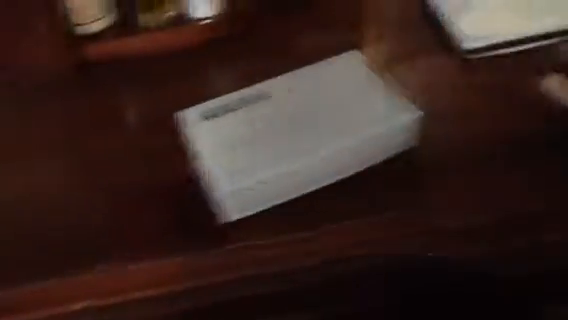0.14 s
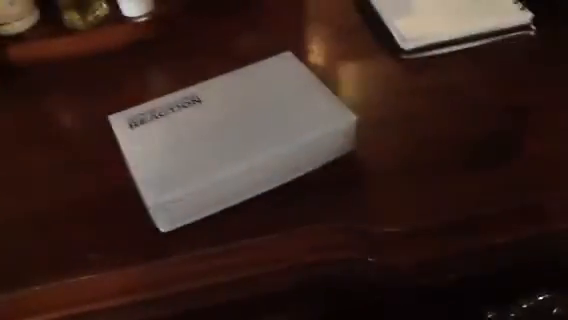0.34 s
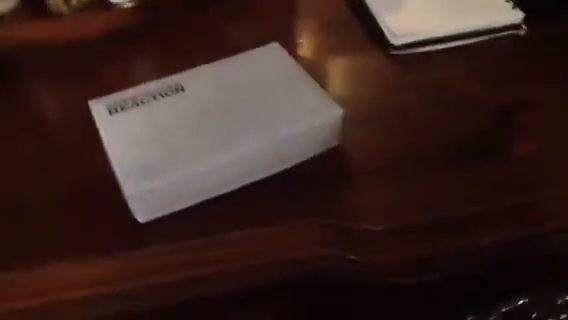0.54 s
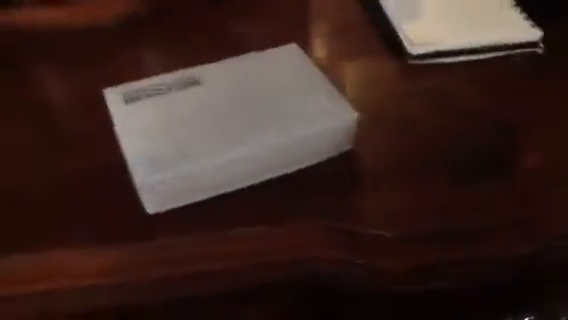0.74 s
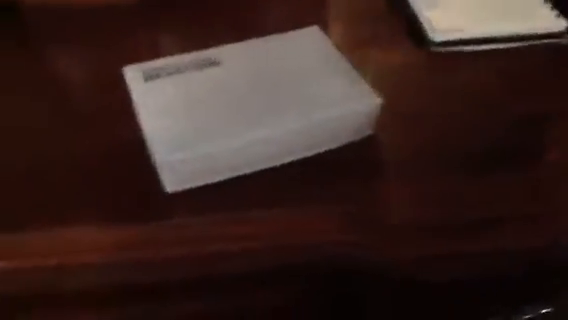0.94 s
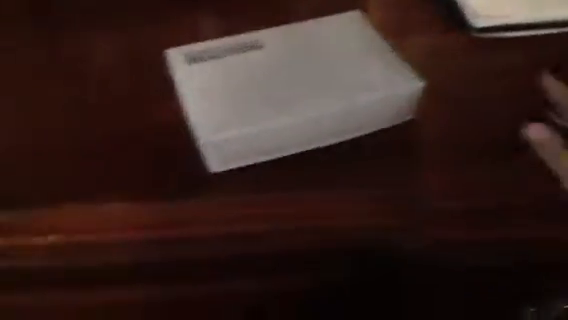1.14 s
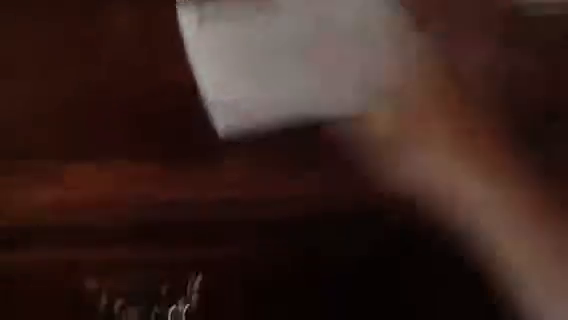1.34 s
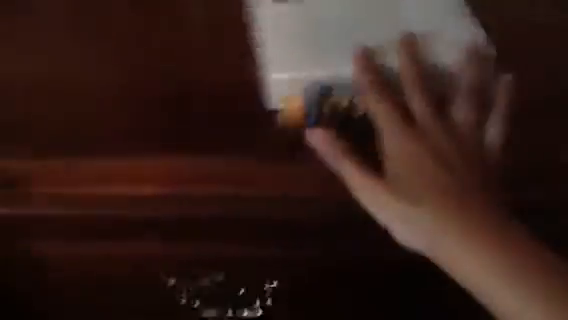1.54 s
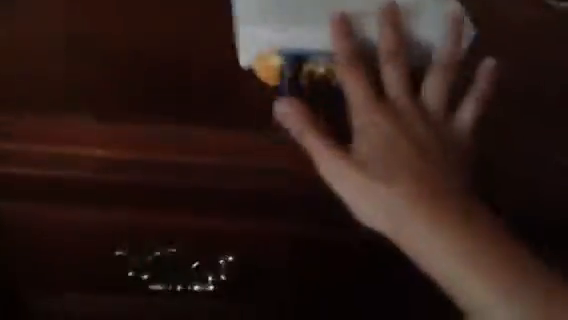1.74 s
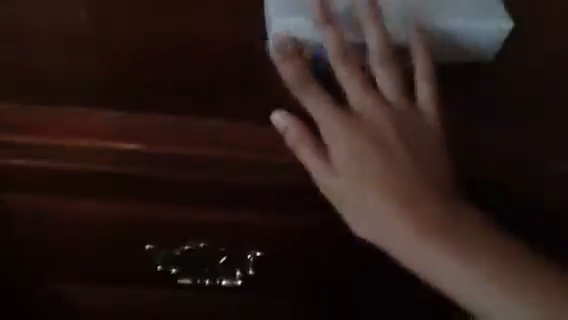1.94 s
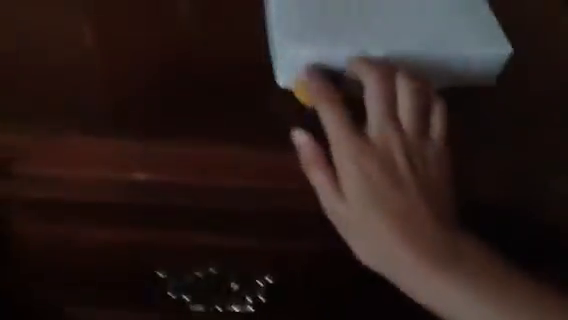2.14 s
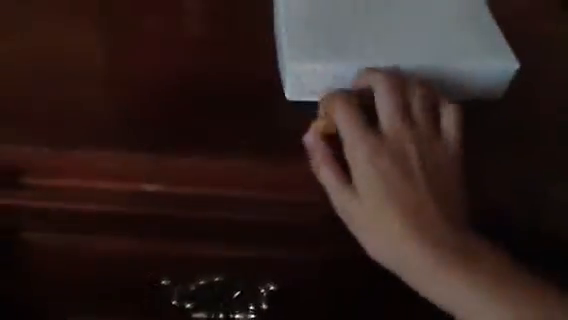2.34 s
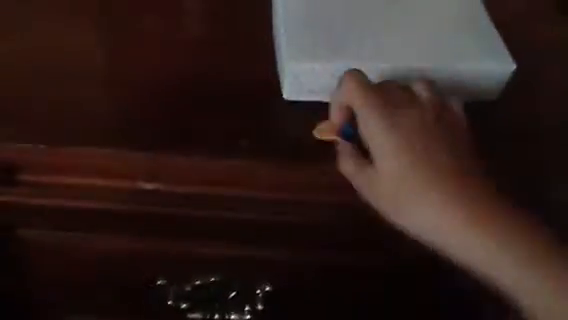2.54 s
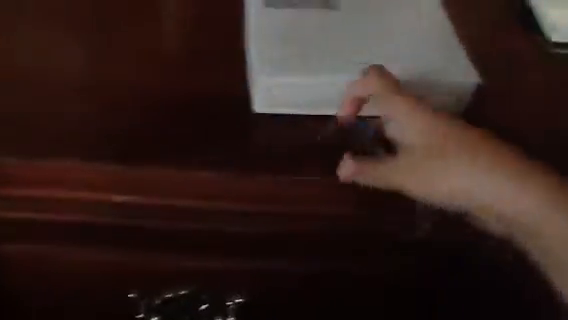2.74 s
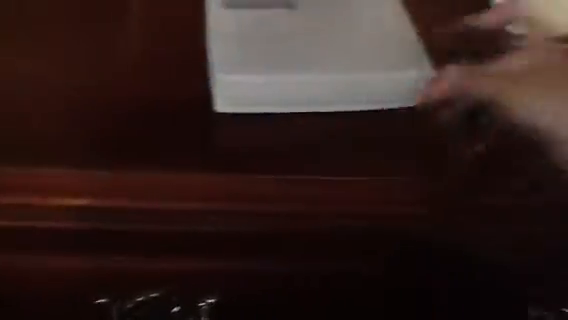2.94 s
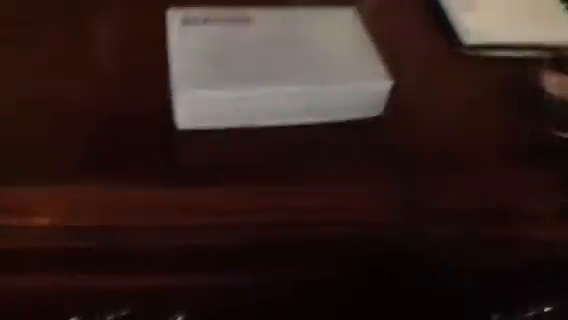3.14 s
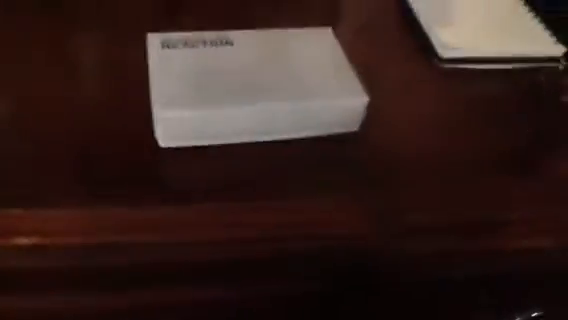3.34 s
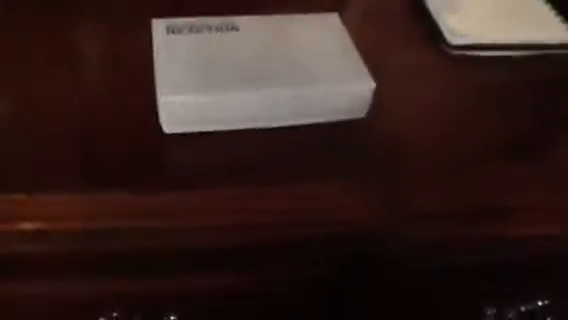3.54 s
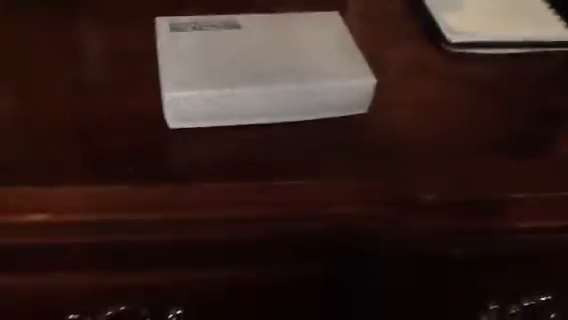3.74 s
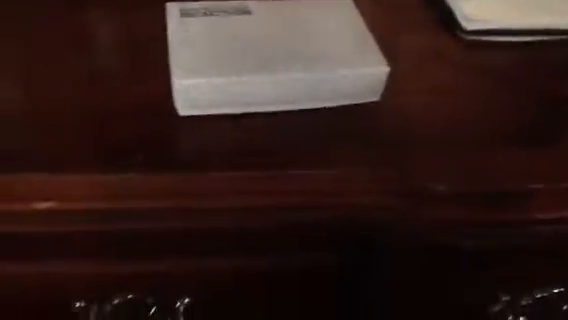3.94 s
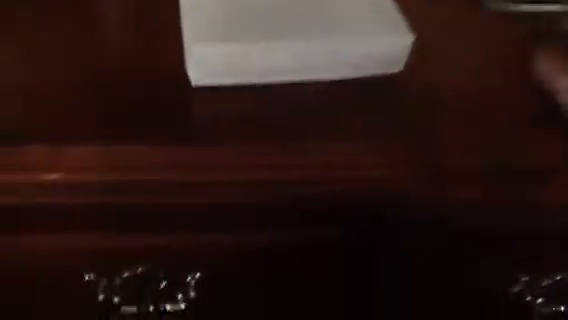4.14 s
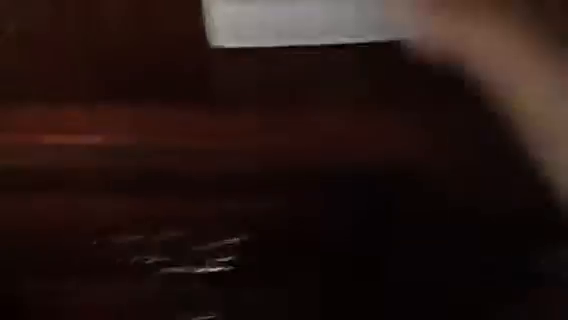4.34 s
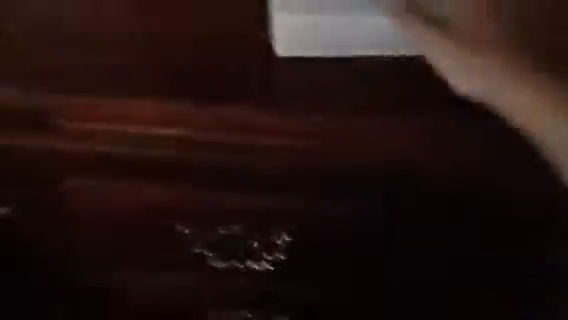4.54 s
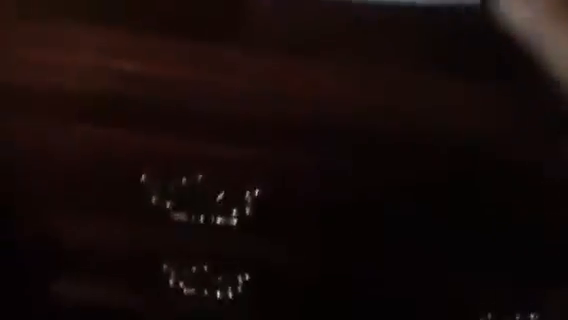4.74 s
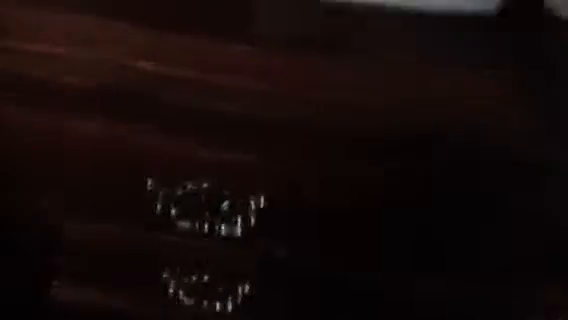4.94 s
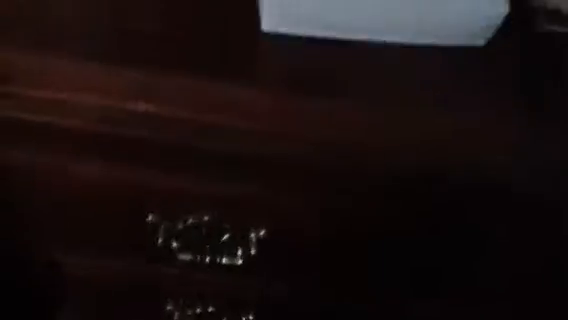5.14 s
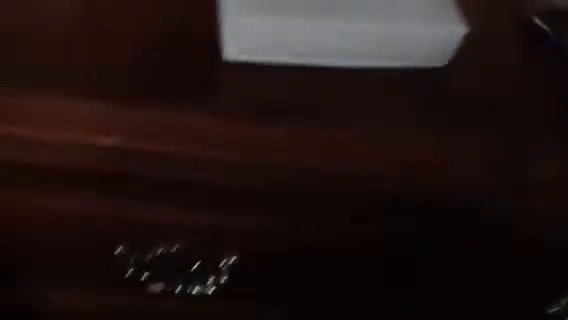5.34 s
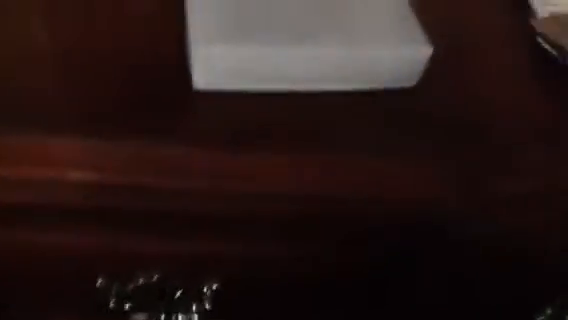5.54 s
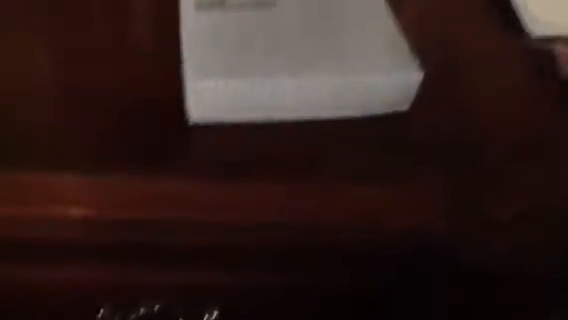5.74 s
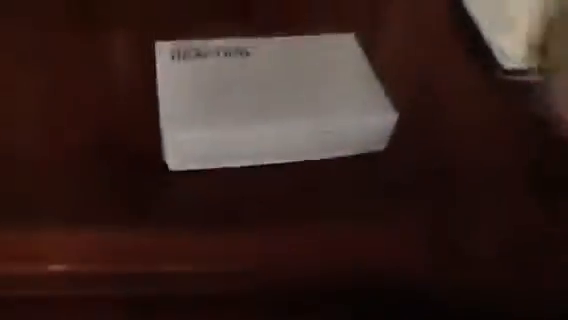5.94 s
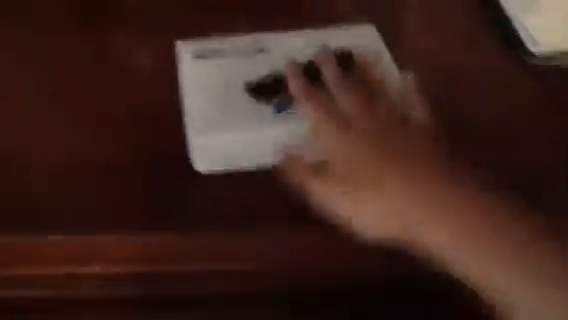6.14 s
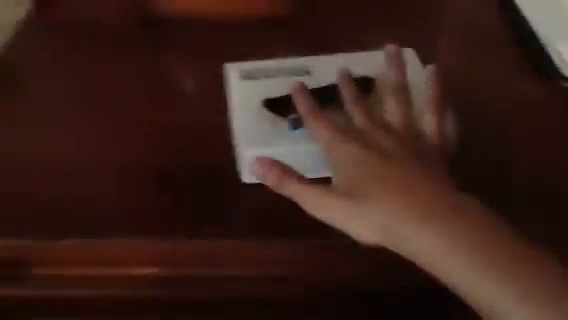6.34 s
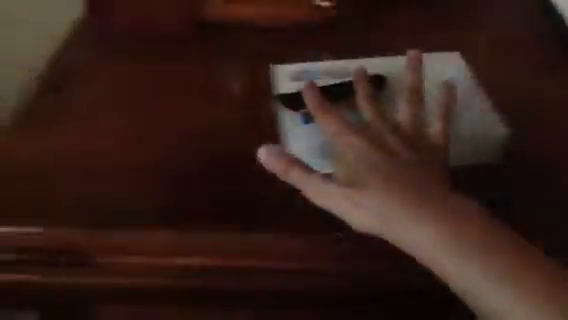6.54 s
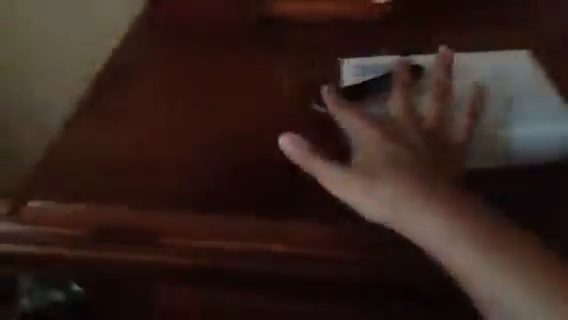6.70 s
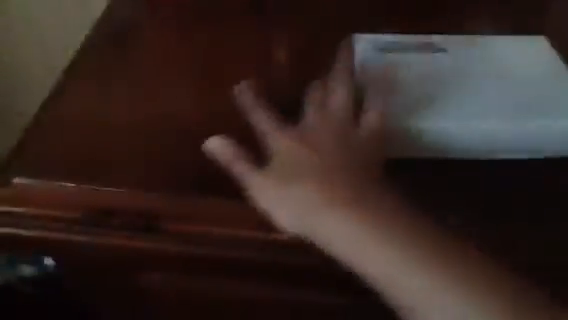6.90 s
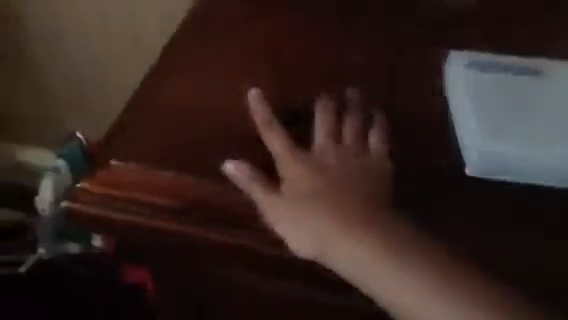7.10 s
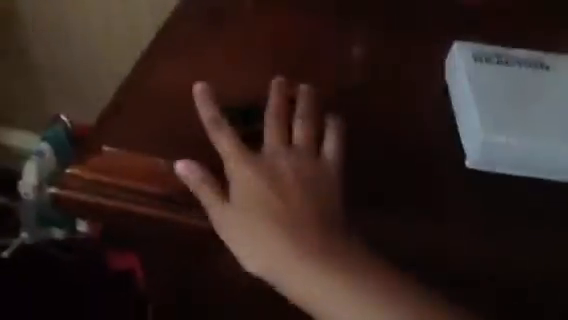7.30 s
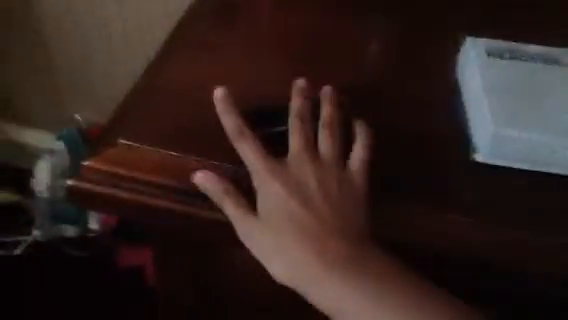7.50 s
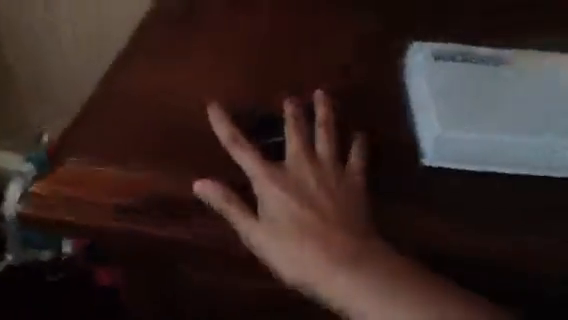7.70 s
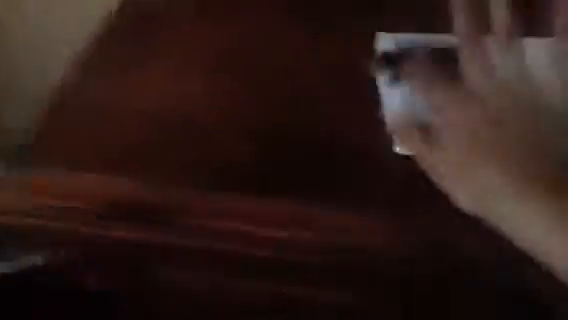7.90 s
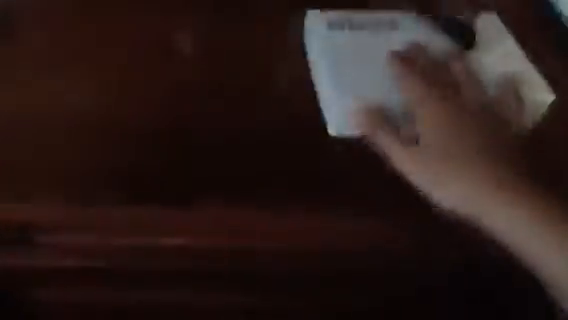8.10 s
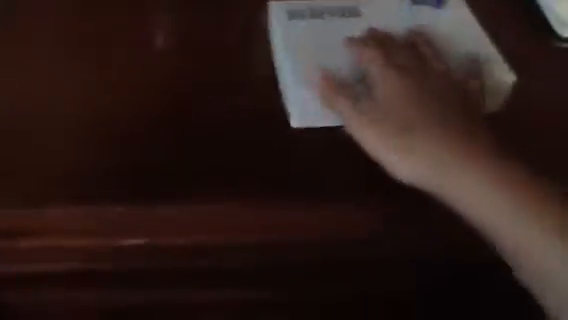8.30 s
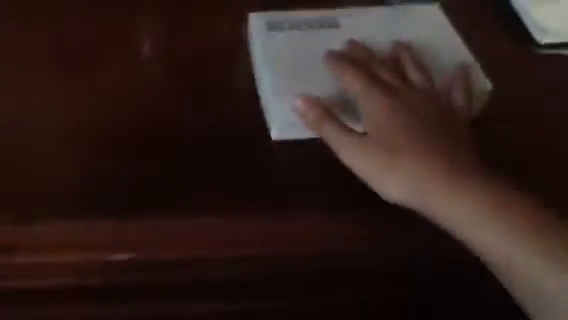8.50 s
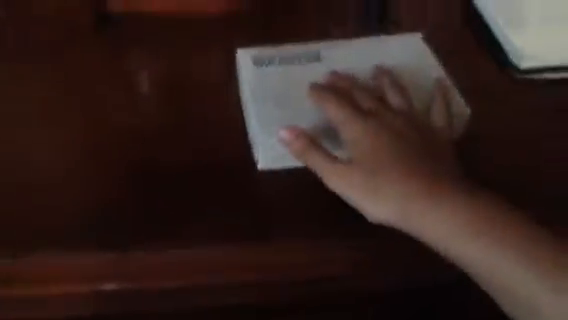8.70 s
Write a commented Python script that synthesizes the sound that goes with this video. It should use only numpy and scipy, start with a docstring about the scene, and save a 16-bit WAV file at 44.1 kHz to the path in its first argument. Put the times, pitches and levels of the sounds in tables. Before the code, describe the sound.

A toy fingerboard clatters on a wooden table in a small room. Its tiny wheels roll with a gritty rumble, then the deck clacks, the metal trucks tick and rattle, and the tabletop knocks hollowly. Clusters of hits come every second or so, some duller on a cardboard box, with light scrapes and brief squeaks between them. The sound is close, with short echoes and a faint room hush.

```python
"""A toy fingerboard clatters on a wooden table and a cardboard box in a small room.
Each hit rings the little deck, ticks the metal trucks (the axle holders) and makes the tabletop boom;
the loose trucks rattle after it. The wheels rumble and hiss over the wood grain and sometimes squeak
as they stick and slip, while deck and fingers scrape as they slide. Nearby surfaces and the walls
add short echoes, and a quiet hush lies under it all."""
import sys
import numpy as np
from scipy import signal
from scipy.fft import rfft, irfft, next_fast_len
from scipy.io import wavfile
from scipy.ndimage import map_coordinates

SR = 44100
rng = np.random.default_rng(int(sys.argv[2]) if len(sys.argv) > 2 else 0)


def wav_record(signal):
    """Record a signal, one row per channel, as 16-bit PCM in the file named by sys.argv[1]."""
    frames = np.transpose(np.atleast_2d(signal))
    bounded = np.clip(frames, -1, 1)
    # unit amplitude maps onto the largest positive 16-bit level
    quanta = np.round(bounded * 32767).astype(np.int16)
    wavfile.write(sys.argv[1], SR, quanta)


N = 390726
TIME = np.arange(N) / SR


def from_db(db):
    """Turn decibels into a number to multiply a sound by."""
    return 10 ** (np.asarray(db) / 20)


def rms(x):
    """The average strength of a sound (root mean square)."""
    return np.sqrt(np.mean(x ** 2) + 1e-20)


def at_hz(points, hz, column=1):
    """Read a table at any pitch, blending between its rows."""
    points = np.array(points)
    return np.interp(np.log(hz + 1e-3), np.log(points[:, 0]), points[:, column])


def band(x, low_hz, high_hz, order=2):
    """Keep the part of a sound between two pitches."""
    sections = signal.butter(order, [low_hz, min(high_hz, .48 * SR)], "band", fs=SR, output="sos")
    return signal.sosfilt(sections, x + 1e-18)


def coloured(x, spectrum):
    """Turn each pitch up or down as a table says."""
    size = next_fast_len(N + 4096)
    gain = from_db(at_hz(spectrum, np.fft.rfftfreq(size, 1 / SR)))
    return irfft(rfft(x, size) * gain, size)[:N]


def envelope(strokes, column, swell_db, attack_s, release_s):
    """Loudness over time: each stroke sets in, swells to its level, eases off and stops."""
    gain = np.zeros(N)
    for row in strokes:
        start, rise_s, fall_s = row[:3]
        corners = start - attack_s + np.cumsum([0, attack_s, rise_s, fall_s, release_s])
        shape_db = np.interp(TIME, corners, [-60, -swell_db, 0, -swell_db, -60], left=-200, right=-200)
        gain += from_db(row[column] + shape_db)
    return gain


def drift(steps_per_s):
    """A smooth random wander, mostly between -1 and 1."""
    return map_coordinates(rng.standard_normal(8000), [TIME * steps_per_s], order=3, mode="wrap")


def ring(x, notes):
    """Shake an object so that its own notes ring; each dies away by 60 dB in its fade_s."""
    out = 0
    for hz, db, fade_s in notes:
        keep, turn = from_db(-60 / (fade_s * SR)), 2 * np.pi * hz / SR
        feedback = [1, -2 * keep * np.cos(turn), keep * keep]
        out = out + from_db(db) * signal.lfilter([1, 0, -1], feedback, x + 1e-18)
    return out


def fading(power, fade_s):
    """Store sound energy and let it leak away."""
    keep = from_db(-120 / (fade_s * SR))
    return signal.lfilter([1 - keep], [1, -keep], power + 1e-18)


def friction(grains_per_s, size_db, flutter_db):
    """Tiny surface bumps of uneven size, met at random."""
    sizes = from_db(size_db * np.minimum(rng.exponential(1, N), 4)) * rng.standard_normal(N)
    met = rng.random(N) < grains_per_s / SR
    grains = sizes * met * from_db(flutter_db * drift(70))
    return grains / rms(grains)


# The tone of the room's background noise: pitch_hz, gain_db
HUSH_COLOUR = [(15, -62.5), (25, -40), (48, -20.5), (91, -34), (133, -13.5), (173, -11.5), (253, -6.5),
               (289, -9), (495, -12), (703, -14.5), (804, -14.5), (919, -21), (4500, -22), (13200, -24),
               (15500, -31.5)]


def room_hush(level_db=-62.5):
    """A quiet, steady noise, strongest in the low notes."""
    hush = coloured(rng.standard_normal(N), HUSH_COLOUR)
    return from_db(level_db) * hush / rms(hush)


# How the room holds on to each pitch: pitch_hz, gain_db, fade_s
ROOM_ECHO = [(200, -14.5, 0.12), (350, -3.5, 0.23), (695, -5.5, 0.28), (1796, -7.5, 0.24), (5000, -3, .25),
             (12990, -8.5, 0.2)]


def wall_echoes(x, build_s=0.011, bands=15):
    """Sound bounces between the walls: in each band of pitches it builds up, then dies away."""
    out, edges = 0, np.geomspace(180, 17000, bands + 1)
    noise = rng.standard_normal((2, N))
    for k, (low, high) in enumerate(zip(edges, edges[1:])):
        hz = np.sqrt(low * high)
        arriving = fading(band(x, low, high) ** 2, build_s)
        stored = fading(arriving, at_hz(ROOM_ECHO, hz, column=2))
        echoes = band(noise[k % 2], low, high)
        out = out + from_db(at_hz(ROOM_ECHO, hz)) * np.sqrt(stored) * echoes / rms(echoes)
    return out


# The tone of the echoes off table, box and shelf: pitch_hz, gain_db
NEAR_COLOUR = [(100, -24), (200, -12.5), (400, -2), (900, -5), (2000, -8), (5000, -6.5), (14000, -3)]


def near_echoes(x, fade_s=0.13, build_s=0.0013):
    """Many quick echoes off nearby surfaces make the sound hollow."""
    t = np.arange(SR // 3) / SR
    echoes = rng.standard_normal(len(t)) * from_db(-60 * t / fade_s) * (1 - np.exp(-(t / build_s) ** 2))
    return coloured(signal.oaconvolve(x, echoes / np.linalg.norm(echoes))[:N], NEAR_COLOUR)


# Wheel squeaks: start_s, length_s, start_pitch_hz, glide_hz_per_s, level_db
SQUEAKS = [(1.226, 0.1, 1530, 2191.5, -36.5), (2.651, 0.079, 2820, -3500, -58.5),
           (3.165, 0.035, 977, -800, -45), (3.211, 0.052, 977, -400, -43), (3.451, 0.051, 805, 1800, -41.5),
           (4.265, 0.13, 2930, -6000, -49), (5.091, .1, 875, -600, -41.5), (5.635, 0.096, 760, 1288, -39.5),
           (5.7, 0.093, 1288, 1650, -29), (5.747, 0.12, 1366, 153, -51), (7.062, 0.12, 1455, 102, -47),
           (7.162, 0.13, 1423, 0, -51), (7.782, 0.087, 1504, 1198, -37)]


def squeaks(waver=0.036, steady_db=-33, flutter_db=2.5, octave_db=-17, rasp_db=-8):
    """A dry wheel sticks and slips on its axle: a raspy tone that swells, glides and fades."""
    out, wobble = np.zeros(N), waver * drift(260)
    rasp = band(rng.standard_normal(N), 30, 260)
    for start, length_s, hz, glide, db in SQUEAKS:
        on = (TIME > start) & (TIME < start + length_s)
        age = TIME[on] - start
        steadiness = 1 + from_db(db - steady_db)   # a loud squeak locks on to its pitch
        pitch_hz = (hz + glide * age) * (1 + wobble[on] / steadiness)
        phase = 2 * np.pi * np.cumsum(pitch_hz) / SR
        swell = np.abs(np.sin(np.pi * age / length_s)) ** 1.5
        out[on] += from_db(db) * swell * (np.sin(phase) + from_db(octave_db) * np.sin(2 * phase))
    return out * from_db(flutter_db * drift(100)) * (1 + from_db(rasp_db) * rasp / rms(rasp))


# Slides over table and box: start_s, press_s, ease_s, drone_gain_db, scratch_level_db
SCRAPES = [(1.5, 0.035, .1, -61, -37.5), (2.295, 0.013, 0.025, -64, -46.5), (2.68, 0.053, .12, -68, -59.5),
           (3.14, .02, 0.058, -53.5, -51.5), (3.22, 0.012, 0.022, -52, -46),
           (3.285, 0.008, 0.031, -46, -40.5), (4.25, 0.032, 0.21, -52, -43),
           (5.096, 0.011, 0.083, -59, -39.5), (5.255, 0.033, 0.078, -34.5, -38),
           (5.38, 0.025, 0.17, -40, -49), (6.38, 0.054, 0.34, -62, -61), (7.815, .008, .012, -62, -36.5),
           (7.85, .09, 0.16, -66, -44), (8.53, 0.14, 0.12, -46, -46.5), (8.77, 0.026, 0.046, -46, -41.5)]
# The tone of the scratch: pitch_hz, gain_db
SCRAPE_COLOUR = [(59, -63), (100, -27), (192, 15), (258, 9), (355, -26), (429, -7.5), (843, -17.5),
                 (2750, -20), (3320, -15), (4560, -32), (6950, -20), (15500, -27.5)]


def scraping():
    """Sliding deck and fingers scratch and make the tabletop drone (its notes are listed below)."""
    slips = friction(grains_per_s=5000, size_db=6.0, flutter_db=3.5)
    drone = band(ring(slips, TABLE_NOTES + PANEL_NOTES), 220, 330)
    scratch = band(coloured(slips, SCRAPE_COLOUR), 920, 15000)
    stroke = dict(swell_db=6, attack_s=.07, release_s=0.15)
    return (from_db(-7) * envelope(SCRAPES, column=3, **stroke) * drone / rms(drone)
            + envelope(SCRAPES, column=4, **stroke) * scratch / rms(scratch))


# The short, high notes of wheel and axle: pitch_hz, gain_db, fade_s
WHIRR_NOTES = [(3430, -2, 0.019), (5910, 3, 0.004), (7640, -3.5, .004)]


def whirr(bumps, gain_db):
    """Bumps make wheel and axle sing faintly."""
    sound = band(ring(bumps, WHIRR_NOTES), 2800, 9000)
    return from_db(gain_db) * sound / rms(sound)


# Pushes that set the wheels rolling: start_s, speed_up_s, coast_s, rumble_gain_db, hiss_gain_db
PUSHES = [(0.0, 0.014, 0.065, -51, -50.5), (0.16, 0.024, 0.15, -44, -53), (0.256, .15, .18, -37, -46),
          (0.745, .05, 0.035, -45.5, -52), (0.84, 0.084, 0.25, -36, -44.5), (1.245, .035, .006, -37.5, -47),
          (3.33, .045, 0.12, -42, -54), (3.59, 0.052, .12, -54.5, -63.5), (3.89, 0.038, 0.094, -53, -60),
          (3.99, 0.051, 0.12, -46, -58.5), (4.202, 0.0094, 0.0073, -35.5, -56),
          (5.095, 0.013, 0.13, -39, -52), (5.65, 0.013, 0.096, -45, -55), (5.89, 0.017, 0.011, -39, -53.5),
          (7.05, 0.07, 0.11, -49, -58.5), (7.315, .008, 0.0083, -46, -55), (7.69, 0.17, .01, -51, -64)]
# The tone of the rolling: pitch_hz, gain_db
ROLL_COLOUR = [(88, -21.5), (150, -13), (197, -3.5), (404, -13.5), (509, -3), (607, -1.5), (827, 5),
               (930, -5), (1370, -0.5), (2020, -4), (2920, -3.5), (4390, -21.5), (7560, -21),
               (13500, -26.5), (15500, -36)]
# The wheels' hollow notes: pitch_hz, gain_db, fade_s
WHEEL_NOTES = [(536, 1.5, 0.024), (800, -13, 0.04), (1020, -1, 0.078), (1430, -1, 0.06), (2310, 0.5, 0.058),
               (2910, -5, 0.022), (3565, 4.5, 0.017), (5480, -4, 0.01), (7360, 3, 0.01)]


def rolling():
    """Hard wheels run over the wood grain: a hollow rumble with a gritty hiss."""
    bumps = friction(grains_per_s=5400, size_db=1.5, flutter_db=3.2)
    hollow = ring(bumps, WHEEL_NOTES)
    sound = coloured(bumps + from_db(-13) * hollow / rms(hollow), ROLL_COLOUR)
    rumble, hiss = band(sound, 150, 2570), band(sound, 5700, 15000)
    singing_hiss = hiss / rms(hiss) + whirr(bumps, gain_db=-8.5)
    push = dict(swell_db=8.5, attack_s=0.13, release_s=0.12)
    return (from_db(-0.5) * envelope(PUSHES, column=3, **push) * rumble / rms(rumble)
            + from_db(5.5) * envelope(PUSHES, column=4, **push) * singing_hiss)


def rattling(graze_db=-30, graze_s=.008, rattle_db=-14.5, rattle_s=0.014):
    """The board grazes the surface just before each of the HITS below; its loose trucks rattle after."""
    gain, age = np.zeros(N + SR), np.arange(-SR // 20, SR // 5) / SR
    graze = from_db(graze_db) * np.exp(age / graze_s)
    rattle = from_db(rattle_db) * np.exp(-age / rattle_s)
    shape = np.where(age < 0, graze, rattle)
    for start_s, strength_db, _, metal_db, _ in HITS:
        start = max(int((start_s + age[0]) * SR), 0)
        gain[start:start + len(age)] += from_db(strength_db + .45 * metal_db) * shape
    grains = band(friction(grains_per_s=2800, size_db=9.0, flutter_db=5.0), 500, 14000, order=1)
    return gain[:N] * grains / rms(grains)


def strike(levels_db, notes_per_hit, band_hz, stretch, drag, chatter_db, ring_db):
    """One part answers each of the HITS below: a click, a brief chatter and its own ringing notes."""
    t, attack = np.arange(int(.2 * SR)) / SR, slice(0, SR // 100)
    out = np.zeros(N + len(t))
    firm_db, usual_weight_db = -28.5, -12
    for (start_s, strength_db, weight_db, *_), db, notes in zip(HITS, levels_db, notes_per_hit):
        # light hits drag on, and extra weight also keeps the board down longer
        lightness = min((firm_db - strength_db) / 9, 1.5)
        press = np.clip(weight_db - usual_weight_db, -12, 12) / 20
        contact_s = 0.0021 * stretch * 2 ** (drag * lightness + press)
        # a longer touch builds more slowly and has a weaker first click
        build = 1 - np.exp(-(t / contact_s * 4) ** 2)
        force = from_db(chatter_db) * rng.standard_normal(len(t)) * np.exp(-t / contact_s) * build
        force[0] += rng.choice([-1, 1]) / (1 + (contact_s / .003) ** 2)
        crack = band(force, *band_hz)
        # each note's strength depends on where the part is touched, here left to chance
        body = ring(crack, [(hz, gain + rng.normal(0, 5.2), fade_s) for hz, gain, fade_s in notes])
        hit = crack / rms(crack[attack]) + from_db(ring_db) * body / rms(body[attack])
        start = int(start_s * SR)
        out[start:start + len(t)] += from_db(db) * hit / rms(hit[attack])
    return out[:N]


# The tabletop's low, booming notes: pitch_hz, gain_db, fade_s
TABLE_NOTES = [(144, -20.5, 0.24), (183, -6, 0.52), (196, -2, 0.17), (220, -5.5, 0.1), (251, 0.5, 0.14),
               (272.3, -9.5, 0.2), (303, -13.5, 0.066)]
# The higher, knocking notes of its wood panel: pitch_hz, gain_db, fade_s
PANEL_NOTES = [(400, -2.5, 0.061), (433.2, 8, 0.093), (508, 10, 0.11), (543.6, 2, 0.057), (670, -1, 0.011),
               (683, 8.5, .1), (807, 4, 0.11), (922, 5.5, 0.15), (998, 0, 0.066)]
# The little deck's notes: pitch_hz, gain_db, fade_s
DECK_NOTES = [(1246, -11.5, 0.04), (1374, -17.5, 0.023), (1616, -1.5, 0.019), (1760, -3, 0.015),
              (2200, -11.5, 0.028), (2398, -7, 0.056), (3010, -9.5, .04), (3280, -8.5, 0.092)]
# The metal trucks' notes: pitch_hz, gain_db, fade_s
TRUCK_NOTES = [(3760, -1, 0.021), (4390, -17, .012), (5100, -5, 0.027), (5610, 10, .018), (5820, 3, 0.013),
               (6960, 12, 0.0042)]
# Times when the cardboard box takes the hits and mutes the wood: start_s, end_s, knock_gain_db
ON_BOX = [(1.5, 1.8, -11), (8.25, 8.86, -5.5)]
# The board's hits; weight is the share that goes into the table, metal the share of the trucks:
# start_s, strength_db, weight_db, metal_db, bend_pitch_hz
HITS = [(0.03, -58, 6, 7, 2330), (0.0676, -31, -2, 2, 2360), (0.0791, -18, -9, -1.5, 3260),
        (0.0842, -23, -5.5, -1.5, 1420), (0.1076, -28.5, -4.5, -6, 1550), (0.181, -40, -20, -5, 1280),
        (0.379, -65, -12, 5, 2330), (1.2179, -36.5, -35, -21, 1400), (1.2883, -24.5, -9, 3.5, 1610),
        (1.3882, -59, 0, 20.5, 2240), (1.4012, -23.5, -35, -10.5, 1770), (1.425, -27.5, -16, -3, 1280),
        (1.44, -25, -12, -2.5, 3070), (1.4547, -26, -24, -5, 1230), (1.474, -34.5, -18, -0.5, 1790),
        (1.547, -18.5, -16.5, 3, 1650), (1.5984, -18.5, -19.5, -11, 2110), (1.616, -32, -17, -14.5, 2240),
        (1.6667, -20, -20.5, -6.5, 1660), (1.6902, -27.5, -16.5, -28.5, 2250), (1.755, -57, -15, 2, 1650),
        (2.2493, -47, -16, -24.5, 1240), (2.3182, -41.5, -17, 6, 2280), (2.445, -67, -13, 9, 3200),
        (2.55, -65, 5.5, 19.5, 2210), (2.7297, -62, -4, 13.5, 2400), (2.7549, -40, -20, -6, 1250),
        (2.824, -60.5, -21.5, 15, 3190), (2.8296, -64, -11, 17, 3190), (3.1299, -48.5, 3.5, 15, 1240),
        (3.2259, -43.5, -14, 3, 2270), (3.2798, -38, -4, 7, 3200), (3.2996, -30.5, -17, -6, 1400),
        (3.4615, -48, -7, 6, 1320), (3.647, -66, 6, 11.5, 1350), (4.217, -30.5, -8, 3, 1410),
        (4.3572, -30, -9.5, 2, 2110), (4.377, -22.5, -5, -1.5, 1700), (4.398, -22, -5, -2, 2260),
        (4.4061, -27, -9.5, -16, 3330), (4.4422, -33.5, -3, 4.5, 2380), (4.4599, -44, 1.5, 0.5, 3150),
        (4.909, -35.5, -2, -0.5, 1330), (4.9371, -44.5, 0.5, 8, 2200), (4.9683, -44.5, -3, 1, 1380),
        (5.509, -40.5, -6, -3.5, 1240), (5.9174, -38.5, -20, 12.5, 1860), (5.9231, -37, -2.5, 10, 1750),
        (6.064, -71, -7, 18.5, 3200), (6.1296, -27.5, -8.5, 3, 1960), (6.134, -22.5, -10.5, 3.5, 2780),
        (6.139, -29.5, -3, -4, 2940), (6.492, -50.5, -12, -6, 2220), (6.6806, -63.5, 16.5, 7, 1660),
        (6.7365, -50, -13, -3.5, 2030), (6.8891, -25, -12.5, 2.5, 2520), (6.9132, -24, -17, -1, 2830),
        (6.93, -34, -2, 11, 1630), (6.96, -26, -4, 3.5, 2320), (6.9814, -25.5, -6.5, -2.5, 1220),
        (6.989, -27.5, -7, -8, 1440), (7.218, -48, -12, -3.5, 1420), (7.6665, -56, -10, 6, 1390),
        (7.828, -37.5, -8, 7, 1430), (7.8406, -30.5, -19, 9, 1570), (7.8924, -23.5, -14, -5, 3030),
        (7.913, -29.5, -18, 3, 1960), (7.929, -20, -4.5, -4.5, 1900), (8.018, -45, 2.5, 12, 1420),
        (8.0394, -36, -9, 3, 2430), (8.0749, -39, -33, 4.5, 1640), (8.2927, -37.5, -1, 4.5, 1400),
        (8.365, -32, -32, -5, 1530), (8.379, -24.5, -6.5, 0.5, 1640), (8.4823, -25, -10.5, -1, 1680),
        (8.5418, -33.5, -1.5, -1, 2520), (8.5927, -39.5, -0.5, 4.5, 1800), (8.6207, -38.5, 7, 0, 1410),
        (8.6829, -24, -3.5, -2.5, 2280), (8.751, -31.5, -3, 0, 1420), (8.6625, -42, -14, 9, 1720),
        (8.7958, -37.5, -2.5, 4, 1430)]


def clatter(bend_db=14, bend_fade_s=0.02):
    """The board comes down: the tabletop booms and knocks, the deck clacks and the trucks tick."""
    start_s, strength_db, weight_db, metal_db, bend_hz = np.transpose(HITS)
    box_db = sum(db * ((start_s > start) & (start_s < end)) for start, end, db in ON_BOX)
    # fingers damp the note of the bending deck and tune it by where they press
    decks = [DECK_NOTES + [(hz, bend_db, bend_fade_s)] for hz in bend_hz]
    boom = strike(strength_db + weight_db, [TABLE_NOTES] * len(HITS), band_hz=(180, 330),
                  stretch=0.82, drag=0.78, chatter_db=-20.5, ring_db=1)
    knock = strike(strength_db + .35 * weight_db + box_db, [PANEL_NOTES] * len(HITS),
                   band_hz=(290, 1150), stretch=1.5, drag=0.87, chatter_db=-11, ring_db=-2.5)
    clack = strike(strength_db, decks, band_hz=(1150, 3400),
                   stretch=0.93, drag=.7, chatter_db=-15.5, ring_db=4.5)
    tick = strike(strength_db + metal_db, [TRUCK_NOTES] * len(HITS), band_hz=(3000, 13900),
                  stretch=1.29, drag=0.19, chatter_db=-6.5, ring_db=-15)
    return from_db(2.5) * boom + from_db(-3.5) * knock + from_db(-2.77) * clack + from_db(0.03) * tick


def scene():
    """The board and its echoes, over the hush of the room."""
    hush = room_hush()
    noises = clatter() + rattling() + rolling() + scraping()
    tones = squeaks()
    direct = noises + tones
    echoes = near_echoes(direct) + wall_echoes(noises + from_db(-12) * tones)
    return (direct + echoes + hush)[None]


# The microphone's tone: pitch_hz, gain_db
MIC_COLOUR = [(60, 3.5), (150, 1), (400, -1), (1000, 1), (2000, -1.5), (2700, -2.5), (4200, -3.5),
              (5500, -2.5), (8000, -2), (11000, -3), (15000, -1.5)]


def record(dry, cutoff_hz=15500):
    """A small microphone tints the sound and sharply cuts the very highest pitches."""
    top_cut = signal.ellip(10, .2, 80, cutoff_hz, fs=SR, output="sos")
    return signal.sosfilt(top_cut, coloured(dry[0], MIC_COLOUR))[None]


dry = scene()
out = record(dry)
wav_record(out)
```